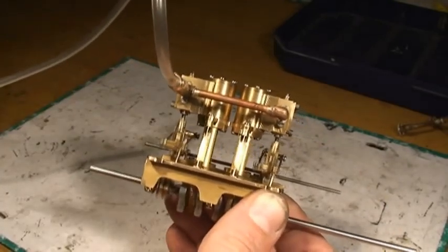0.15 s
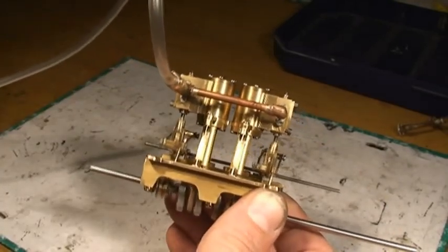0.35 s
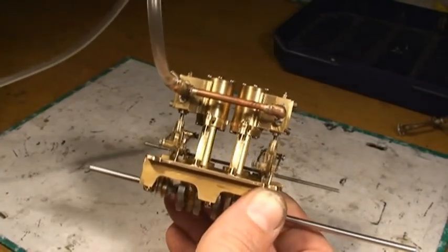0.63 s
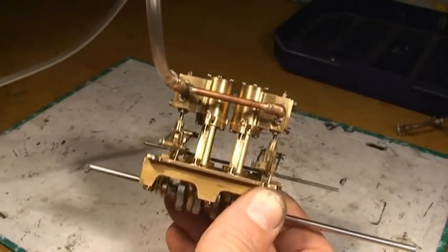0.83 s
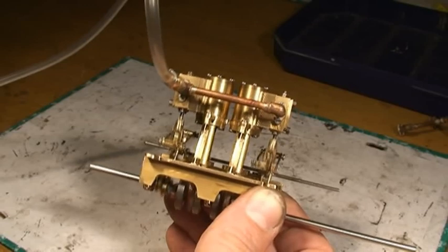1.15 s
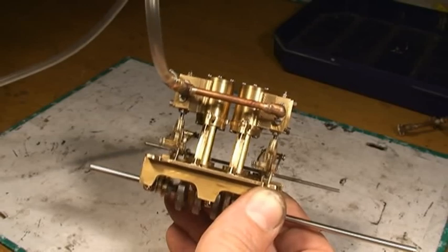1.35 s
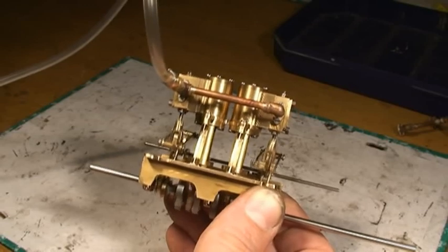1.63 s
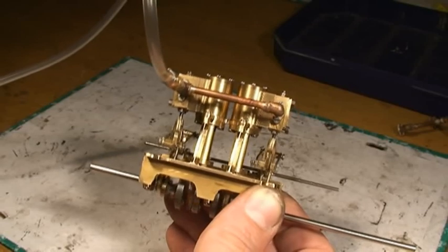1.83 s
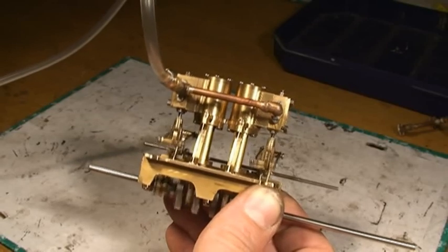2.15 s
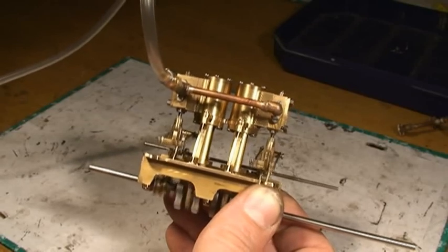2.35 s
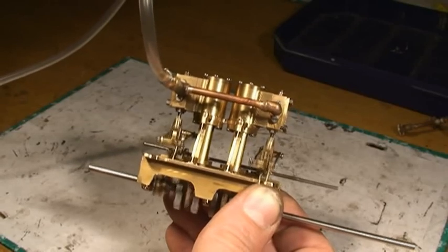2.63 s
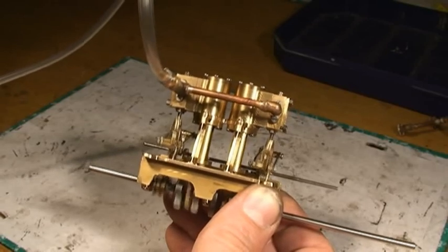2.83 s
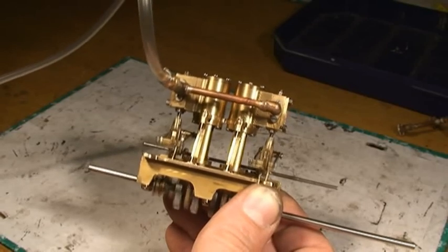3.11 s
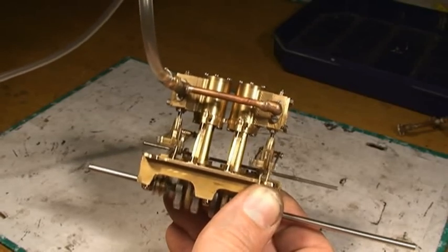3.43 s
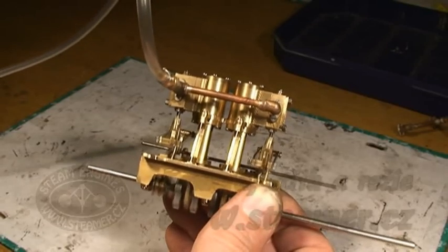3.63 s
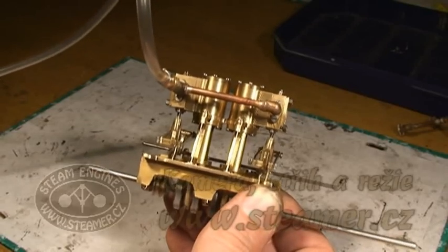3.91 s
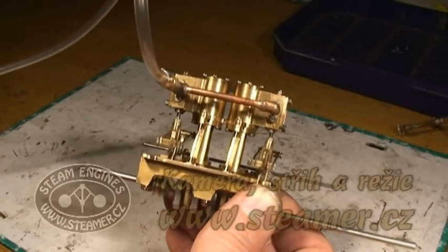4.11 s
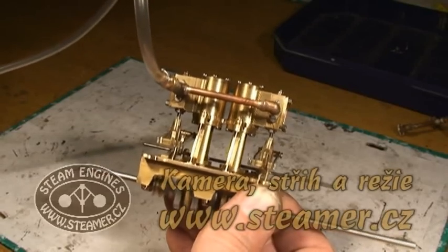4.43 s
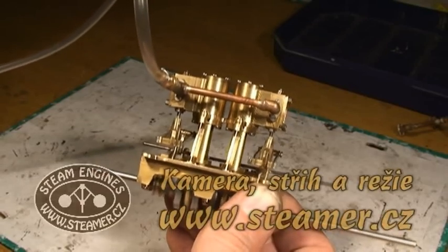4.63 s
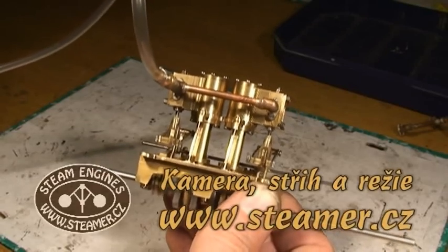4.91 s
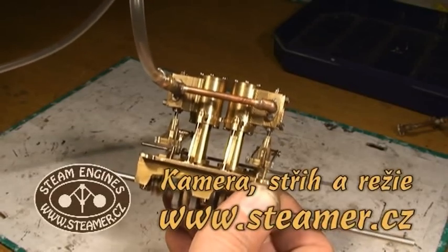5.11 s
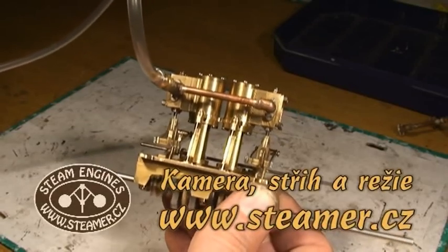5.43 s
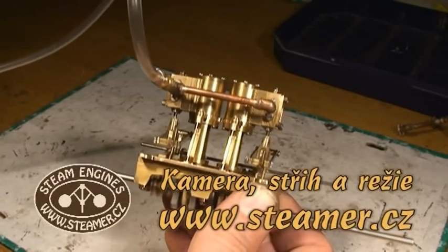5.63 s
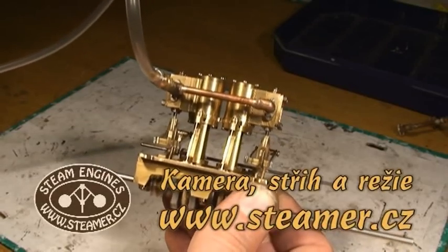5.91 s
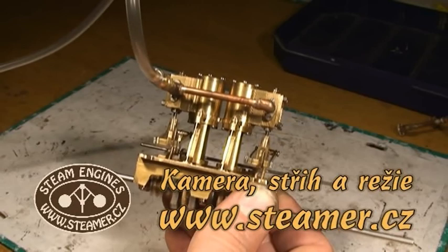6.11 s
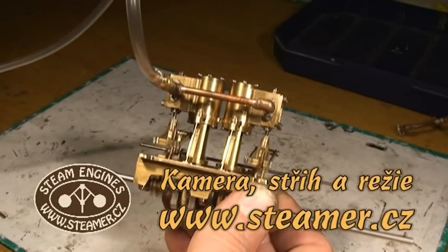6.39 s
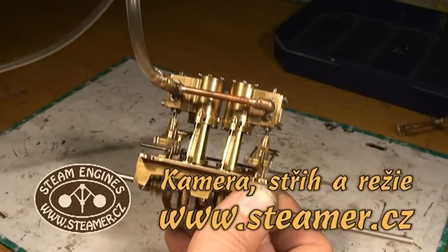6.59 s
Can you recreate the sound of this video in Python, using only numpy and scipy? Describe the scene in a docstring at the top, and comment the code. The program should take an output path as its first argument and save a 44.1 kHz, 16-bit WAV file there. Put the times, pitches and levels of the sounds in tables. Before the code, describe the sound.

Rapid puffs and light metallic ticks from a miniature steam engine merge into a fast, hissing buzz as it races.

```python
"""Miniature steam engine, idling and racing

A hand-held twin-cylinder engine coasts down to a chuffing idle over a workbench, then gets more
steam and races. Four exhaust strokes a turn release turbulent puffs and excite thumping resonances,
while play in the bearings makes the rods knock. At speed the strokes merge into a harmonic series,
a buzzing hum under the hiss of leaking steam."""
import sys
import numpy as np
from scipy import signal
from scipy.fft import rfft, irfft
from scipy.io import wavfile
from scipy.ndimage import uniform_filter1d

SR = 44100
rng = np.random.default_rng(int(sys.argv[2]) if len(sys.argv) > 2 else 0)


def generate_wav(sig):
    """Save sig (samples, or channels by samples) to the path in sys.argv[1] as 16-bit PCM at SR."""
    pcm = np.round(np.clip(np.atleast_2d(sig).T, -1, 1) * 32767).astype(np.int16)
    wavfile.write(sys.argv[1], SR, pcm)


N = 298101
T = np.arange(N) / SR
FULL_SPEED_HZ = 63.2


def undb(db):
    """Amplitude ratio of a level in decibels."""
    return 10 ** (np.asarray(db) / 20)


def unit(x):
    """Normalisation to rms 1."""
    return x / np.sqrt(np.mean(x ** 2))


def above(speed, knee_hz, steepness):
    """Sigmoid transition: a gain rising from 0 to 1, one half at the knee."""
    return 1 / (1 + (knee_hz / speed) ** steepness)


def noise(spectrum, peaks=(), peak_db=0):
    """Spectral shaping: noise of rms 1 with a smooth envelope and Lorentzian resonance peaks."""
    f = np.arange(N // 2 + 1) * SR / N + 1e-3
    hz, db = np.transpose(spectrum)
    envelope = undb(np.interp(np.log(f), np.log(hz), db))
    lift = sum(undb(level + peak_db) ** 2 / (1 + (2 * (f - centre) / width) ** 2)
               for centre, width, level in peaks)
    return unit(irfft(rfft(rng.standard_normal(N)) * envelope * np.sqrt(1 + lift), N))


def ring(x, modes):
    """Modal superposition: the summed responses of damped resonators."""
    return sum(undb(db) * signal.lfilter(*signal.iirpeak(hz, hz / width, SR), x)
               for hz, width, db in modes)


def lag(x, seconds):
    """First-order relaxation with the given time constant."""
    pole = np.exp(-1 / (seconds * SR))
    return signal.lfilter([1 - pole], [1, -pole], x)


def flutter(rate_hz):
    """Random fluctuation of rms 1, gliding between values drawn at the given rate."""
    hold = int(SR / rate_hz)
    steps = np.repeat(rng.standard_normal(N // hold + 1), hold)
    return unit(uniform_filter1d(steps, hold)[:N])


def impulses(angle, places, sizes_db, scatter_db, play_turns):
    """Quasi-periodic excitation: a slightly uneven impulse as the crank passes each place."""
    turns = np.arange(int(angle[-1]) + 1)[:, None]
    chance = np.clip(rng.standard_normal((len(turns), len(places), 2)), -1.5, 1.5)
    hit_angles = turns + places + play_turns * chance[..., 0]
    at = np.interp(hit_angles, angle, np.arange(N), right=-1).astype(int)
    size = undb(sizes_db + scatter_db * chance[..., 1])
    return np.bincount(at[at >= 0], size[at >= 0], N)


# Exhaust strokes of one turn: puff_angle_turns, puff_db, thump_angle_turns, thump_db
STROKES = [(.205, 0, .192, 3), (.432, 4.5, .422, 3.5), (.648, 2, .695, 3), (.87, -0.5, .835, 1)]
# Spectra of a puff and of the steam jet at idle and at full flow: frequency_hz, level_db
PUFF_SPECTRUM = [(700, -26.5), (1600, -10.5), (3500, -17), (5200, -8.5), (5900, 5), (6700, 1), (7600, 1.5),
                 (10200, 0), (11200, -12), (13000, -4), (16000, -11.5)]
IDLE_JET_SPECTRUM = [(820, -53), (1400, -30), (1610, -16.5), (2040, -14.5), (3160, -11.5), (4120, -6.5),
                     (5160, -10.5), (5600, -5.5), (6590, -2.5), (7150, -7), (7680, -6), (11100, -7),
                     (13200, -9.5), (15200, -8.5), (16000, -31)]
FULL_JET_SPECTRUM = [(1350, -26), (2300, -8), (2680, -12.5), (3370, -7.5), (3650, -4), (4230, -2.5),
                     (4850, -4.5), (6290, -3), (7110, -2.5), (8920, -3), (11000, -0.5), (11700, -2.5),
                     (12900, -1), (15400, -2.5), (16000, -18)]
# Whistling resonances of the ports at idle and at full flow: pitch_hz, bandwidth_hz, level_db
IDLE_PORT_MODES = [(5940, 110, -22), (6300, 170, -4), (6676, 69, 3.5), (8060, 82, -5), (9450, 90, 0.5),
                   (11650, 67, 1.5), (11750, 76, -4), (11960, 56, 5.5), (12900, 140, 0)]
FULL_PORT_MODES = [(6360, 160, 5), (7600, 69, 6.5), (9040, 150, 8), (9700, 150, 2.5), (10000, 190, 3),
                   (11790, 37, 10.5), (11700, 86, 1), (12800, 40, -5), (12110, 300, 10.5),
                   (13100, 200, -16.5), (14160, 110, 7.5), (15200, 140, 3)]


def steam(angle, speed, valve, draw, strain):
    """Turbulent jet noise: each stroke puffs over a leak, which masks the puffs as the flow grows."""
    places, puff_db, _, _ = np.transpose(STROKES)
    strokes = impulses(angle, places, puff_db, scatter_db=1.2, play_turns=.004)
    # the port stays open a few milliseconds, then the cylinder empties
    flow = lag(lag(strokes, .0014), .0034) / speed
    flow = flow / flow.mean()
    puffs = noise(PUFF_SPECTRUM, IDLE_PORT_MODES, peak_db=1) * flow * undb(-6.5 - 3.8 * draw)
    idle = noise(IDLE_JET_SPECTRUM, IDLE_PORT_MODES, peak_db=3)
    full = noise(FULL_JET_SPECTRUM, FULL_PORT_MODES, peak_db=-2.5)
    leak = np.sqrt(1 - draw) * idle + np.sqrt(draw) * full
    leak *= 1 + 0.082 * (flow - 1)  # breathes with the strokes
    leak *= undb(flutter(700))  # wet steam sputters
    level_db = -27 - 6.5 * (1 - valve) + 3.5 * strain
    return (puffs + leak * undb(-2 + 2.4 * draw)) * undb(level_db)


# Impacts of rods and valve gear in one turn: angle_turns, knock_db, tick_db
IMPACTS = [(.265, -6, 14), (.32, 1.5, -14), (0.472, -5.5, -10), (0.531, -8, 1.5), (.70, -4.5, -2),
           (.80, -2, 2), (.87, -11, 3.5)]
# Modes of the brass frame and of the steel rods: pitch_hz, bandwidth_hz, level_db
FRAME_MODES = [(1632, 45, 2), (1950, 200, 0.5), (2140, 130, -6.5), (2666, 260, 1)]
ROD_MODES = [(3570, 82, -8), (4130, 240, -2.5), (4190, 270, -6), (4540, 100, -1.5)]
# Bouts of louder rod rattle: middle_s, length_s, boost_db
RATTLES = [(.08, 0.32, 4.5), (3.967, 0.27, 6), (5.55, .75, 4.5), (6.45, 0.55, 3.5)]


def clatter(angle, speed, valve, draw, strain):
    """Impact excitation: bearing play rings the frame and rods, harder under pressure and strain."""
    places, knock_db, tick_db = np.transpose(IMPACTS)
    knocks = ring(impulses(angle, places, knock_db, scatter_db=2.8, play_turns=.002), FRAME_MODES)
    ticks = ring(impulses(angle, places, tick_db, scatter_db=2, play_turns=.004), ROD_MODES)
    rattle_db = sum(db * np.exp(-(2 * (T - middle) / length) ** 4) for middle, length, db in RATTLES)
    knocks = unit(knocks / np.sqrt(speed)) * undb(-49.5 + 5 * draw)
    ticks = unit(ticks / np.sqrt(speed)) * undb(-46 - 4.5 * (1 - valve) + 20 * strain + rattle_db)
    return knocks + ticks


# Resonances of the exhaust passages and cupped hand: pitch_hz, bandwidth_hz, level_db
EXHAUST_MODES = [(42, 24, 0), (110, 14.5, 3), (153, 40, 0), (198, 46, 2.5), (263, 26, 2), (369.6, 28, -2),
                 (531, 39, -4.5), (668, 21, -3), (920, 61, -4), (1390, 130, -13)]


def thumps(angle, speed, valve):
    """Cavity resonance: each stroke's pressure step thumps in the exhaust, yielding to hum at speed."""
    _, _, places, thump_db = np.transpose(STROKES)
    strokes = impulses(angle, places, thump_db, scatter_db=.6, play_turns=.001)
    highpass = signal.butter(1, 25, "high", fs=SR, output="sos")
    pressure = signal.sosfilt(highpass, ring(strokes, EXHAUST_MODES))
    pressure = unit(lag(pressure, .00026) / np.sqrt(speed))
    merged = above(speed, knee_hz=49.3, steepness=10.4)
    return pressure * undb(-42 - 11.5 * (1 - valve)) * (1 - merged)


# Partials of the coasting crank's wobble: shaft_multiple, level_db
WOBBLE_PARTIALS = [(5, -3), (6, -0.5), (7, -23), (9, 0.5), (10, -4.5)]


def wobble(angle):
    """Decaying vibration: the freewheeling crank hums in the hand, its pitch tied to the shaft rate."""
    fade_db_per_s = 7.5
    partials = sum(undb(db) * np.cos(2 * np.pi * (order * angle + rng.random()))
                   for order, db in WOBBLE_PARTIALS)
    return np.sqrt(2) * partials * undb(-52.5 - fade_db_per_s * T)


# Spectrum of the low exhaust turbulence: frequency_hz, level_db
RUSH_SPECTRUM = [(25, -28), (80, -14), (140, -3), (250, 7.5), (450, -0.5), (800, 3), (1150, -1), (1600, 0),
                 (2300, -25), (3200, -33), (5000, -42)]


def exhaust_rush(draw):
    """Flow noise: low turbulence grows with the steam drawn."""
    return noise(RUSH_SPECTRUM) * undb(-60.5 + 12.8 * draw ** 2)


# Spectrum of the quiet workshop: frequency_hz, level_db
WORKSHOP_SPECTRUM = [(20, -5), (50, -0.5), (110, -5), (250, -5), (500, -5.5), (1200, -14.5), (4000, -39)]


def workshop():
    """Ambient noise floor: steady and mostly low in frequency."""
    return noise(WORKSHOP_SPECTRUM) * undb(-58)


def harmonic(angle, order):
    """Fourier component: a wavering multiple of the shaft rate, in phase with the stroke pattern."""
    _, _, places, thump_db = np.transpose(STROKES)
    phase = np.angle(np.sum(undb(thump_db) * np.exp(-2j * np.pi * order * places)))
    waver_db = (0.28 + 0.077 * order) * flutter(14)
    return np.sqrt(2) * undb(waver_db) * np.cos(2 * np.pi * order * angle + phase)


# Shaking forces of pistons and strokes, strongest four times a turn: shaft_multiple, level_db
SHAKING_FORCES = [(2, -10), (3, -11.5), (4, 0.5), (5, -12), (6, -8.5)]
# Response of the hand-held engine body to shaking: frequency_hz, gain_db
BODY_RESPONSE = [(75, -26), (102, 1), (117, -3), (126, -16.5), (143, -21), (168, -6.5), (203, -4.5),
                 (222, -21), (233, -4.5), (253, -0.5), (315, -7), (350, 2.5), (380, -0.4)]
# Partials of the buzz at full speed: shaft_multiple, level_db
BUZZ_PARTIALS = [(7, -24), (8, -13.5), (9, -11.5), (10, -16), (11, -8), (12, -21), (13, -11), (14, -13.5),
                 (15, -17), (16, -17.5), (17, -19), (18, -17.5), (19, -31), (20, -19.5), (21, -17.5),
                 (22, -17.5), (23, -19), (24, -20), (25, -13), (26, -17.5), (27, -21.5), (28, -21),
                 (29, -21), (30, -31), (31, -19)]


def hum(angle, speed):
    """Forced vibration: shaft harmonics swell and sink as they slide through the body's resonances."""
    body_hz, body_db = np.transpose(BODY_RESPONSE)
    shake = sum(harmonic(angle, order) * undb(db + np.interp(order * speed, body_hz, body_db))
                for order, db in SHAKING_FORCES)
    orders, buzz_db = np.transpose(BUZZ_PARTIALS)
    # the buzz's spectral envelope, extended one order below its lowest partial
    envelope_orders, envelope_db = np.r_[orders[0] - 1, orders], np.r_[-6.5, buzz_db]
    crank_share = 0.37  # this much of the colour moves with the shaft; the rest stays in the body
    buzz = 0
    for order, crank_db in BUZZ_PARTIALS:
        formant_db = np.interp(order * speed / FULL_SPEED_HZ, envelope_orders, envelope_db)
        buzz += harmonic(angle, order) * undb(crank_share * crank_db + (1 - crank_share) * formant_db)
    buzz *= above(speed, knee_hz=29.5, steepness=2.94)
    onset = above(speed, knee_hz=20.8, steepness=14)
    return (shake * undb(-36) + buzz * undb(-37.5)) * onset


def diffuse_tail(samples, t60_s, gap_s):
    """Diffuse impulse response: exponentially decaying noise of unit energy, after a short gap."""
    t = T[:samples]
    tail = rng.standard_normal(samples) * undb(-60 * t / t60_s) * (t > gap_s)
    return tail / np.sqrt(np.sum(tail ** 2))


def bench(x, t60_s, wet_db):
    """Interference: close reflections between engine, hand and bench comb the spectrum finely."""
    echoes = signal.fftconvolve(x, diffuse_tail(SR // 20, t60_s, gap_s=.002))[:N]
    return (x + undb(wet_db) * echoes) / np.sqrt(1 + undb(wet_db) ** 2)


def widen(x, band_hz, t60_s, wet_db):
    """Stereo width: a short, band-limited tail, in antiphase between channels, widens hiss and hum."""
    bandpass = signal.butter(5, band_hz, "band", fs=SR, output="sos")
    tail = signal.sosfilt(bandpass, diffuse_tail(SR // 3, t60_s, gap_s=.001))
    return x + np.array([[1], [-1]]) * undb(wet_db) * signal.fftconvolve(x, tail)[:N]


def pan(left_db):
    """Level-difference panning: channel gains for a left-minus-right level."""
    return undb(np.array([[left_db], [-left_db]]) / 2)


# Crankshaft rotation rate: time_s, speed_hz
SHAFT_SPEED = [(0.0, 19.12), (0.6, 16.08), (1.24, 14.84), (2.49, 14.48), (2.93, 13.69), (3.05, 14.58),
               (3.14, 18.55), (3.35, 25.84), (3.42, 33.8), (3.74, 57.48), (4.37, 58.97), (4.54, 61.75),
               (4.92, 63.35), (5.37, 63.0), (6.05, 63.47), (6.76, 62.25)]
# Steam valve, eased back to an idle and then thrown open: time_s, opening_fraction
VALVE_OPENING = [(0, 0.49), (.35, 0.22), (1.3, 0.24), (2.5, 0.32), (3.05, 0.35), (3.22, 0.94), (6.76, 0.98)]


def scene():
    """Superposition: the engine's sources, driven by valve and crank, add to the workshop's noise."""
    speed = np.interp(T, *np.transpose(SHAFT_SPEED))
    valve = np.interp(T, *np.transpose(VALVE_OPENING))
    angle = np.cumsum(speed) / SR  # in turns
    # steam drawn grows with opening and speed; pressure that the crank cannot yet use strains it
    draw = valve * np.minimum(speed / FULL_SPEED_HZ, 1)
    strain = (valve - draw) ** 2
    rush = exhaust_rush(draw)
    bright = steam(angle, speed, valve, draw, strain) + clatter(angle, speed, valve, draw, strain)
    bright = bench(bright, t60_s=.03, wet_db=-11)
    low = thumps(angle, speed, valve) + hum(angle, speed) + wobble(angle) + rush
    treble = widen(bright, [5000, 10500], t60_s=.05, wet_db=-9)
    bass = widen(low, [300, 1500], t60_s=.08, wet_db=-12.5)
    return treble * pan(-.4) + bass * pan(-1.9) + workshop()


def record(dry):
    """Band limiting: a steep low-pass filter removes the highest treble."""
    cutoff_hz = 15750
    return signal.sosfilt(signal.ellip(12, .1, 80, cutoff_hz, fs=SR, output="sos"), dry)


dry = scene()
out = record(dry)
generate_wav(out)
```